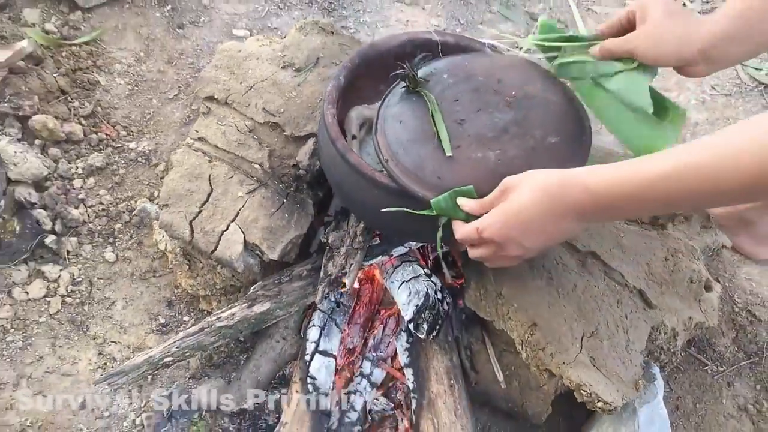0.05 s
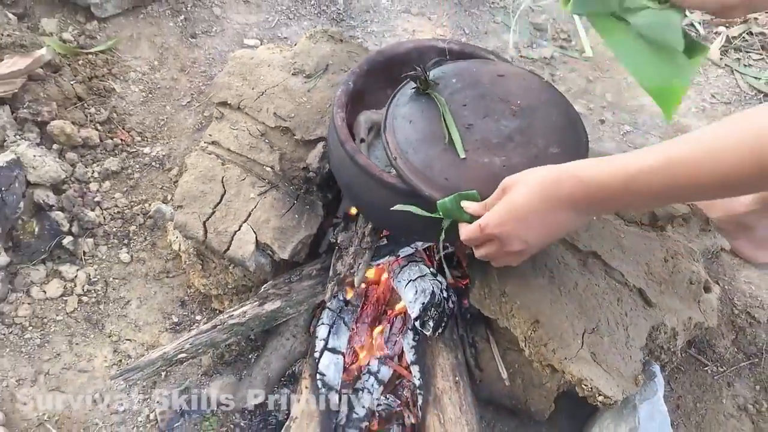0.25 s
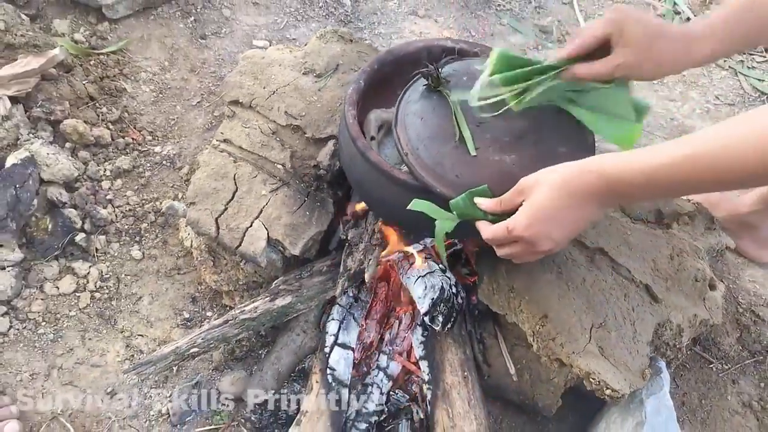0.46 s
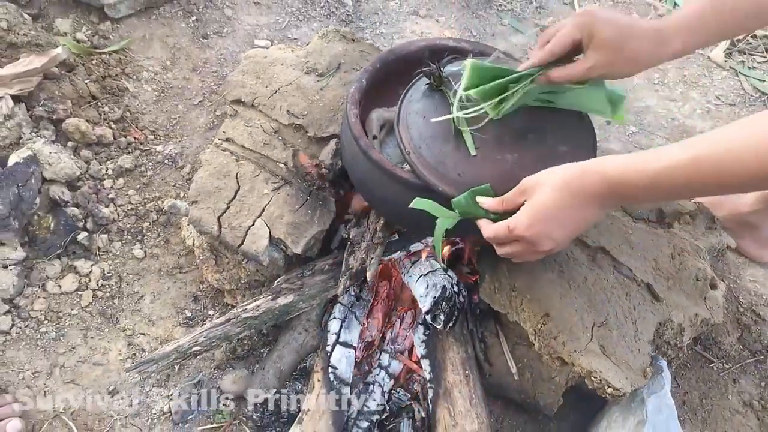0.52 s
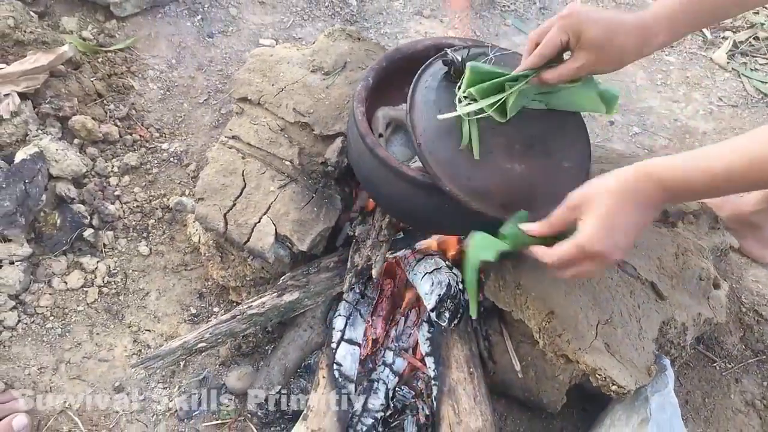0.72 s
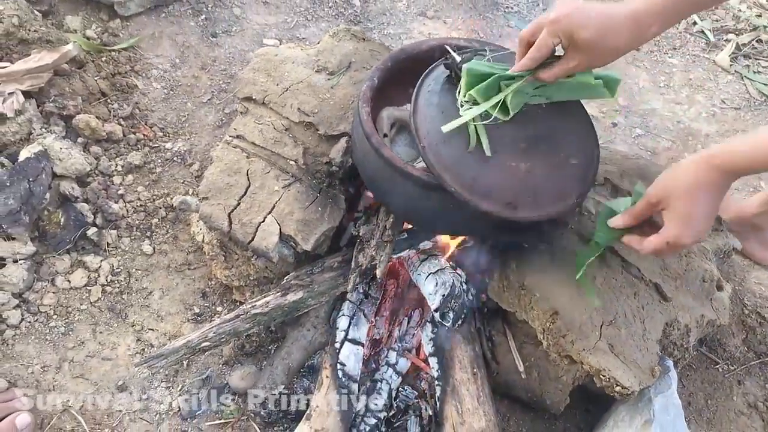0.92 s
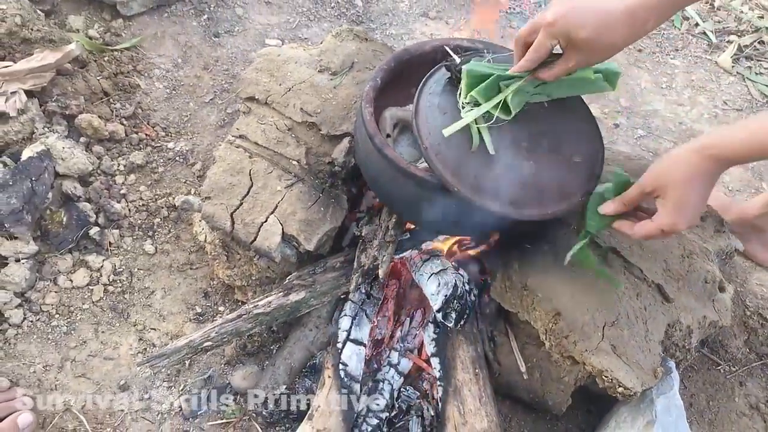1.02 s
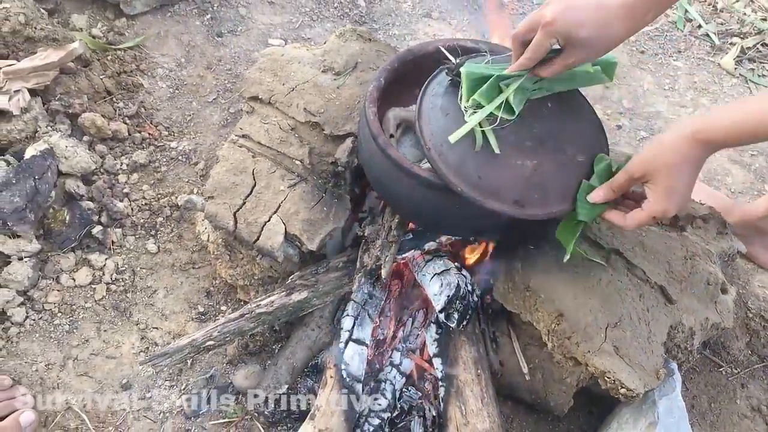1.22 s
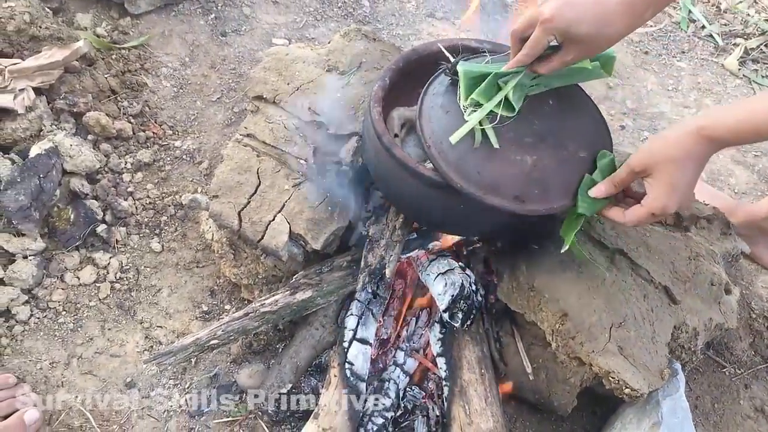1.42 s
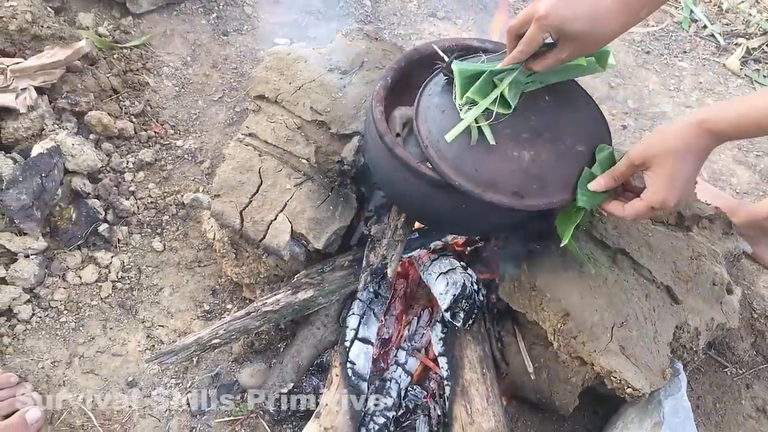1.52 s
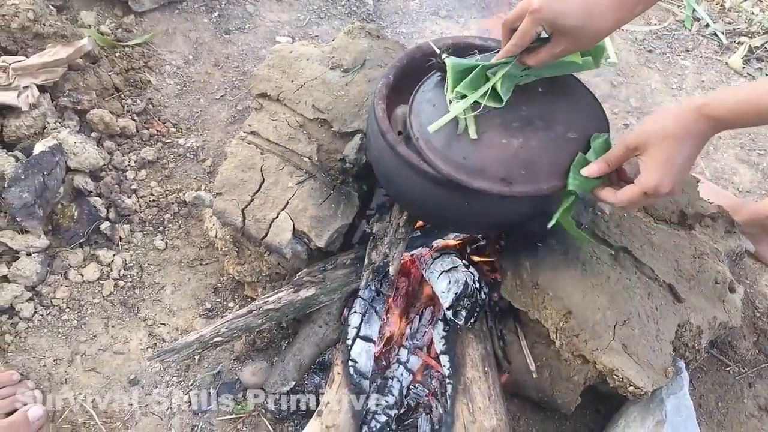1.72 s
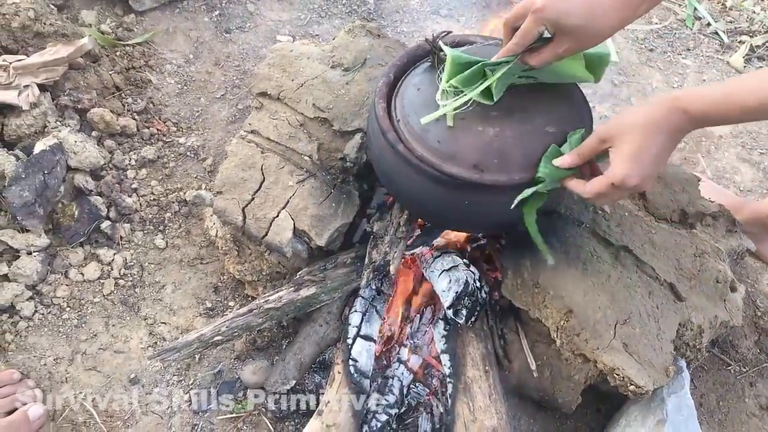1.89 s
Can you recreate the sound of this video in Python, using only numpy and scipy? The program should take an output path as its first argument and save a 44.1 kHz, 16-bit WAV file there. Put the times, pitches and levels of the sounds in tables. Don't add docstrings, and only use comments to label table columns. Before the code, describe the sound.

Close outdoor sound of a clay pot lid: short gritty scrape, one hard hollow clack, soft leaf rustle and tiny ticks, a muffled double pat, then a louder squeaky drag, over faint flames, birds and airy hiss.

```python
import sys
import numpy as np
from scipy import signal
from scipy.io import wavfile
from scipy.ndimage import uniform_filter1d

SR = 44100
rng = np.random.default_rng(int(sys.argv[2]) if len(sys.argv) > 2 else 0)


def wav_out(sig):
    wavfile.write(sys.argv[1], SR, np.round(np.clip(np.atleast_2d(sig).T, -1, 1) * 32767).astype(np.int16))


def linear_from_db(decibels):
    return 10 ** (np.asarray(decibels, float) / 20)


N = 85995
T = np.arange(N) / SR

# pitch in Hz, level in dB, time to fall 60 dB in seconds,
# pitch rise in % when the rim carries the lid's weight.
BODY_MODES = [(383.3, -4.5, 0.073, 1.5), (460, -12.5, 0.097, 0.3), (599, -9, 0.029, -3),
              (914, -9.5, 0.057, 11), (985, -13, 0.047, 6), (1270.5, -6, 0.12, 4), (1807, -9.5, 0.25, -5),
              (1824, -14.5, 0.057, -1.5), (2273, -0.5, 0.15, 1.1), (2870, -6.5, 0.085, 2),
              (3460, -8, 0.08, 0.3), (3772, -5.5, 0.073, 2.2), (4230, -3.5, 0.04, 0.5),
              (4306, -18, 0.064, 2)]
# pitch in Hz, level when dragged in dB, level when knocked in dB,
# time to fall 60 dB in seconds, pitch rise under the lid's weight in %.
RIM_MODES = [(4790, -24, -47.5, 0.11, 1.2), (5400, -20.5, -50, 0.055, .1), (5750, -6, -27.5, 0.072, 2.4),
             (5930, -16, -40.5, 0.12, 0.8), (7170, -18, -35, 0.097, .2), (7534, -11, -56, 0.055, 0.58),
             (8050, -21.5, -56, 0.08, .1), (9020, -18, -51.5, 0.062, .5), (9465, -11, -50, 0.026, 0.52),
             (11600, -14.5, -59, 0.072, 1.1), (11300, -21, -60, .05, 0.74), (13100, -20.5, -67.5, .05, .5),
             (14600, -22.5, -59, .03, .5), (15400, -38, -68, .04, .5)]
# pitch in Hz, level in dB.
WALL_MODES = [(1390, -7.5), (1920, -11.5), (3050, -8.5), (5560, -15.5), (6100, -28), (7350, -56),
              (14950, -42.5)]
WALL_T60_S = 0.044

# time in seconds, level in dB, brightness in dB per octave,
# extra weight on the pot's belly in dB.
DRAG_OFF = [(0, -41, -2.3, 1.7), (.05, -42, -1.5, 6), (.1, -36.5, -0.5, 7), (.15, -38.5, -1.5, 2),
            (.175, -42, -1.5, 4.5), (.21, -50.5, -2, 5)]
# time in seconds, level in dB, brightness in dB per octave,
# extra weight on the pot's belly in dB.
DRAG_ON = [(1.412, -59, 3, -8), (1.428, -47, 2.5, -3), (1.5, -43.5, 0.5, 1), (1.56, -37.5, 0.1, 2),
           (1.695, -39.5, 1.1, 2), (1.73, -51, 1.5, -3), (1.785, -41, 0, 8.5), (1.825, -32.5, 1, -1),
           (1.868, -34.5, -0.5, 0.5), (1.91, -31.5, -1, 2.5), (1.95, -34.5, -1.3, 0)]
# start in seconds, level in dB, brightness in dB per octave.
TOUCHES = [(0.253, -36, 1.5), (0.483, -47.5, 4), (0.491, -46.5, 2), (0.569, -47.5, 1), (0.8689, -35.5, -1),
           (0.8841, -38, 2), (1.4243, -43.5, 1.5)]
# time in seconds, load (1 gives the pitch rises listed with the
LID_LOAD = [(0, .25), (.2, .2), (1.42, 1.3), (1.55, 0.9), (1.7, .6), (1.8, .1), (1.95, .05)]
# frequency in Hz, level in dB per Hz.
GRIND_SPECTRUM = [(150, -44), (250, -19.5), (1640, 0), (2280, -26), (2570, 3), (5790, -10), (15500, -25.5)]
# lowest Hz, highest Hz, change in dB.
BITES = [(2600, 4000, -3.5), (5200, 6400, 6.5), (7250, 7800, 9.5)]
# start in seconds, length in seconds, level in dB.
SINGS = [(0.042, 0.045, -33.5), (0.094, 0.022, -38), (0.113, 0.053, -31), (1.82, 0.047, -28),
         (1.882, 0.039, -28), (1.92, .05, -29)]
BITE_S, TOUCH_S = 1.805, 0.0045
BELLY_HZ = 700
SKIRT_DB, SKIRT_SHARE = -6, 0.3
RADIATES_HZ = 350

# time in seconds, level in dB, brightness in dB per octave, crack level in dB.
KNOCKS = [
    (0.2188, 0, -0.35, -15.5),
    (.2515, -28.5, 3.5, -26.5),
]
# pitch in Hz, level in dB, time to fall 60 dB in seconds.
FREE_MODES = [(409, -4, 0.03), (472, -15.5, 0.064), (604, -10, 0.031), (847, -19, 0.12), (950, -7, .025),
              (1281, -11, 0.098), (1512, -4, 0.013), (1764, -26, 0.15), (2276, -2.5, .11),
              (2540, -28, 0.0089), (2860, -32, 0.13), (3450, -18.5, .035), (3750, -33, 0.16),
              (4168, -17, 0.067)]
# time in seconds, level in dB.
THUMPS = [
    (.2515, -22),
    (0.2733, -25.5),
]
THUMP_HZ, THUMP_T60_S = 427, 0.037
CRACK_HZ, CRACK_S = 3240, 0.0015
RATTLE_DB, RATTLE_S = -14, 0.019
SETTLE_S, SETTLE_FOR_S, SETTLE_DB_PER_S = 0.25, 0.3, 130
KNOCK_CONTACT_HZ, PAT_CONTACT_HZ = 4800, 1600

# time in seconds, level in dB, brightness in dB per octave.
PATS = [(.576, -39, -2.2), (.8694, -15, -1.3), (.8709, -8.5, -0.72), (.8885, -24, 3.1), (.8945, -30.5, 7.5)]
# pitch in Hz, level in dB, time to fall 60 dB in seconds.
PAT_MODES = [(460, -6, 0.018), (628, 7.7, 0.014), (600, -33, 0.36), (871, -9, 0.078), (1000, 0, 0.027),
             (1270, -20, 0.086), (1500, -18.5, 0.053), (2266, -7, 0.15)]

# time in seconds, level in dB, brightness in dB per octave.
LEAVES = [(.28, -53.5, 5), (.35, -50, -3.0), (.4, -75.5, -9.5), (.55, -71, -10.5), (.6, -52, 1.5),
          (.656, -47, 6), (.7, -52.5, 6), (.735, -61, 1), (.76, -48, 1.5), (.86, -48, 0), (.92, -71.5, -13),
          (.985, -52.5, 4), (1.05, -65.5, 1.5), (1.18, -64, 3.5), (1.23, -51.5, 5), (1.42, -99, 3)]
# frequency in Hz, level in dB per Hz.
LEAF_SPECTRUM = [(290, -42), (500, -8.5), (954, -13), (1060, -8.5), (2230, 1), (15500, -26.5)]
CRINKLES_PER_S, CRINKLE_SHARE = 430, 0.36
# time in seconds, peak level in dB.
TICKS = [(0.5901, -37.5), (0.7483, -39), (0.9398, -46), (0.9527, -38), (1.125, -44), (1.1922, -41.5),
         (1.3117, -40), (1.351, -36), (1.366, -35.5)]
TICK_HZ, TICK_S = 6500, 0.0019

# start in seconds, length in seconds, level in dB, first pitch in Hz, last pitch in Hz.
CHIRPS = [(.418, .045, -61, 3500, 2720), (.567, .028, -58, 2900, 3050), (.594, .016, -56, 3350, 3250),
          (.714, .03, -60, 2750, 2650), (.98, .012, -58, 3650, 3600), (1.052, .06, -66, 3450, 3700),
          (1.01, .04, -68, 2700, 2800), (1.1, .035, -58, 2720, 2700), (1.17, .18, -70, 1125, 1080),
          (1.246, .014, -59, 2900, 3050), (1.26, .016, -58, 3250, 3500), (1.275, .028, -56, 3850, 3650),
          (1.322, .026, -59, 3030, 3000)]

# frequency in Hz, level in dB per Hz.
RUMBLE_SPECTRUM = [(22, -6), (37, -2.5), (60, 3.5), (113, -3.5), (162, -5), (400, -29.5)]
# time in seconds, level in dB.
GUST = [(0.0, -45.5), (0.2, -56.5), (0.216, -42.5), (0.314, -63.5), (0.406, -47.5), (0.456, -55.5),
        (0.846, -60), (0.868, -46.5), (1.01, -64), (1.248, -50), (1.336, -62), (1.498, -48.5),
        (1.52, -62.5), (1.606, -49), (1.77, -55.5), (1.814, -44.5), (1.91, -52), (1.95, -41)]
# time in seconds, level in dB.
PUFFS = [(0.006, -28), (0.036, -28.5), (0.104, -45), (0.226, -54), (0.413, -35), (0.712, -34),
         (1.137, -36.5), (1.24, -32.5), (1.308, -34.5), (1.435, -36), (1.501, -37.5), (1.638, -26.5),
         (1.719, -37.5), (1.812, -26), (1.93, -29)]
RUMBLE_DB, GUST_FOLLOWS = -49.5, 0.78
PUFF_HZ, PUFF_S = 63, 0.0071
# frequency in Hz, level in dB per Hz.
AIR_SPECTRUM = [(120, -86), (200, -9), (345, -5.5), (812, -8.5), (3480, -10.5), (4920, -18), (9310, -17.5),
                (15500, -25.5)]
AIR_DB = -58.5


def rms_one(x):
    return x / np.sqrt(np.mean(x ** 2) + 1e-20)


def in_time(rows):
    s, *columns = np.transpose(rows)
    inside = 1.0 * (T >= s[0]) * (T <= s[-1])
    return [uniform_filter1d(inside, size=300)] + [np.interp(T, s, c) for c in columns]


def drift(rate_hz):
    r = np.exp(-2 * np.pi * rate_hz / SR)
    noise = rng.standard_normal(N + SR)
    return rms_one(signal.lfilter([1], [1, -2 * r, r * r], noise)[SR:])


def filtered(x, order, hz, kind="low"):
    return signal.sosfilt(signal.butter(order, hz, kind, fs=SR, output="sos"), x)


def clicks_at(s, sizes):
    out = np.zeros(N)
    out[(np.asarray(s) * SR).astype(int)] = sizes
    return out


def grains(rate, spread_db):
    sizes = linear_from_db(spread_db * np.minimum(rng.exponential(1, N), 4)) * rng.choice([-1, 1], N)
    return rms_one(sizes * (rng.random(N) < rate / SR))


def ring(clicks, hz, t60):
    r, w = linear_from_db(-60 / (t60 * SR)), 2 * np.pi * hz / SR
    return signal.lfilter([0, np.sin(w)], [1, -2 * r * np.cos(w), r * r], clicks + 1e-18)


def ring_moving(clicks, turn, t60):
    decay = linear_from_db(-60 / (t60 * SR))
    return (signal.lfilter([1], [1, -decay], clicks / turn + 1e-18) * turn).imag


def coloured(source, spectrum, patchy_db, patch_hz, tilt_db=0):
    hz, db = np.transpose(spectrum)
    edges = np.geomspace(hz[0], hz[-1] * 1.2, int(2.5 * np.log2(hz[-1] / hz[0])) + 1)
    out, power = 0, 0
    for k, (low, high) in enumerate(zip(edges, edges[1:])):
        mid = np.sqrt(low * high)
        band = filtered(source, 2, [low, high], "band") * (-1) ** k
        band = band * linear_from_db(np.interp(np.log(mid), np.log(hz), db))
        power += np.mean(band ** 2)
        out = out + band * linear_from_db(patchy_db * drift(patch_hz) + tilt_db * np.log2(mid / 3000))
    return out / np.sqrt(power)


def radiated(x):
    return filtered(x, 6, RADIATES_HZ, "high")


def drag_push():
    off, off_db, off_tilt, off_belly = in_time(DRAG_OFF)
    on, on_db, on_tilt, on_belly = in_time(DRAG_ON)
    stutter = linear_from_db(0.5 * drift(37.7))
    push = (off * linear_from_db(off_db) + on * linear_from_db(on_db)) * stutter + 1e-9
    weighted_tilt = push * np.where(T < 1, off_tilt, on_tilt)
    for s, db, bright_db in TOUCHES:
        u = np.clip((T - s) / TOUCH_S, 0, 50)
        burst = 2 * linear_from_db(db) * np.sqrt(u) * np.exp(-u)
        push = push + burst
        weighted_tilt = weighted_tilt + burst * bright_db
    return push, weighted_tilt / push, np.where(T < 1, off_belly, on_belly)


def drag():
    push, tilt_db, belly_db = drag_push()
    grit = grains(rate=2700, spread_db=3.5)
    grind = coloured(grit, GRIND_SPECTRUM, patchy_db=0.5, patch_hz=13, tilt_db=tilt_db)
    out = linear_from_db(-17) * push * grind
    load, waver = in_time(LID_LOAD)[1], 0.0032 * drift(14.7)
    rim = [(hz, db, t60, rise) for hz, db, _, t60, rise in RIM_MODES]
    walls = [(hz, db, WALL_T60_S, 0) for hz, db in WALL_MODES]
    for hz, db, t60, rise in list(BODY_MODES) + rim + walls:
        pitch = hz * (1 + rise / 100 * load + np.roll(waver, int(hz)))
        turn = np.exp(2j * np.pi * np.cumsum(pitch) / SR)
        bite_db = sum(change for low, high, change in BITES if low < hz < high)
        level_db = db - 6.0 + tilt_db * np.log2(hz / 2300) + belly_db * (hz < BELLY_HZ)
        level_db = level_db + (T > BITE_S) * bite_db + 1.7 * drift(20)
        own = grit * push * linear_from_db(level_db)
        for gain, t in (1, t60), (linear_from_db(SKIRT_DB), t60 * SKIRT_SHARE):
            even = np.sqrt(4 * np.log(1000) / (t * SR))
            out += gain * ring_moving(own * rng.choice([-1, 1], N), turn, t) * even
    return radiated(out)


def singing():
    hz = BODY_MODES[8][0]
    swell = sum(linear_from_db(db) * np.sin(np.pi * np.clip((T - s) / length, 0, 1)) for s, length, db in SINGS)
    swell = swell * linear_from_db(2.5 * drift(30))
    return swell * np.sin(2 * np.pi * np.cumsum(hz + 25 * drift(25)) / SR)


def crack(s, crack_db):
    hits, fade = clicks_at(s, linear_from_db(crack_db)), 0
    for db, seconds in (0, CRACK_S), (RATTLE_DB, RATTLE_S):
        fade = fade + linear_from_db(db) * signal.lfilter([1], [1, -np.exp(-1 / (seconds * SR))], hits)
    noise = filtered(rng.standard_normal(N), 2, [CRACK_HZ * 0.73, CRACK_HZ * 1.25], "band")
    return fade * rms_one(noise)


def knocks():
    s, db, tilt_db, crack_db = np.transpose(KNOCKS)
    rim = [(hz, knocked_db, t60) for hz, _, knocked_db, t60, _ in RIM_MODES]
    out = 0
    for k, (hz, mode_db, t60) in enumerate(list(FREE_MODES) + rim):
        blows = clicks_at(s, linear_from_db(db + mode_db + tilt_db * np.log2(hz / 2300)))
        out = out + (-1) ** k * ring(blows, hz, t60)
    out = out + crack(s, crack_db)
    settling = np.clip(T - SETTLE_S, 0, None) * (T < SETTLE_S + SETTLE_FOR_S)
    out = out * linear_from_db(-SETTLE_DB_PER_S * settling)
    thump_s, thump_db = np.transpose(THUMPS)
    out = out + ring(clicks_at(thump_s, linear_from_db(thump_db)), THUMP_HZ, THUMP_T60_S)
    return radiated(filtered(out, 2, KNOCK_CONTACT_HZ))


def pats():
    s, db, tilt_db = np.transpose(PATS)
    out = 0
    for hz, mode_db, t60 in PAT_MODES:
        pushes = clicks_at(s, linear_from_db(db + mode_db + tilt_db * np.log2(hz / 500)))
        out = out + ring(pushes, hz, t60)
    return radiated(linear_from_db(-7) * filtered(out, 2, PAT_CONTACT_HZ))


def leaves():
    on, db, tilt_db = in_time(LEAVES)
    crinkles = grains(CRINKLES_PER_S * linear_from_db(1.7 * drift(37)), spread_db=0.0)
    source = CRINKLE_SHARE * crinkles + (1 - CRINKLE_SHARE) * rng.standard_normal(N)
    return on * linear_from_db(db - 2.1) * coloured(source, LEAF_SPECTRUM, patchy_db=3.5, patch_hz=30, tilt_db=tilt_db)


def ticks():
    out = np.zeros(N + SR)
    fade = np.exp(-np.arange(600) / SR / TICK_S)
    for s, db in TICKS:
        burst = rng.standard_normal(600) * fade
        snap = filtered(burst, 2, [TICK_HZ * 0.36, TICK_HZ * 1.45], "band")
        out[int(s * SR):][:600] += linear_from_db(db - 2.0) * snap
    return out[:N]


def birds():
    out = np.zeros(N)
    for s, length, db, first_hz, last_hz in CHIRPS:
        u = np.clip((T - s) / length, 0, 1)
        swell = np.sqrt(np.abs(np.sin(np.pi * u))) * (u < 1)
        pitch = first_hz + (last_hz - first_hz) * u
        out += linear_from_db(db + 6) * swell * np.sin(2 * np.pi * np.cumsum(pitch) / SR)
    trees = rng.standard_normal(4000) * np.exp(-np.arange(4000) / SR / 0.03)
    return out * linear_from_db(2.5 * drift(70)) + linear_from_db(-34) * signal.fftconvolve(out, trees)[:N]


def flames():
    gust_db = in_time(GUST)[1]
    rumble = coloured(rng.standard_normal(N), RUMBLE_SPECTRUM, patchy_db=0.5, patch_hz=2.7)
    out = linear_from_db(RUMBLE_DB + GUST_FOLLOWS * (gust_db - gust_db.mean())) * rumble
    for s, db in PUFFS:
        pitch, phase = rng.random(2)
        hz = PUFF_HZ * (0.85 + 0.4 * pitch)
        swell = np.exp(-((T - s) / PUFF_S) ** 2 / 2)
        out += linear_from_db(db - 1.4) * swell * np.cos(2 * np.pi * (hz * (T - s) + phase))
    return out


def open_air():
    return linear_from_db(AIR_DB) * coloured(rng.standard_normal(N), AIR_SPECTRUM, patchy_db=-0.7, patch_hz=9.1)


def scene():
    air = open_air()
    pot = drag() + singing() + knocks() + pats()
    around = leaves() + ticks() + birds() + flames()
    return (pot + around + air)[None]


def band_limit(x):
    return signal.sosfilt(signal.butter(12, 16500, fs=SR, output="sos"), x)


def record(dry):
    top = 1.1
    rounded = top * np.tanh(dry / top)
    mix = signal.sosfilt(signal.ellip(10, 0.5, 60, 15700, fs=SR, output="sos"), rounded)
    return band_limit(mix)


dry = scene()
out = record(dry)
wav_out(out)
```